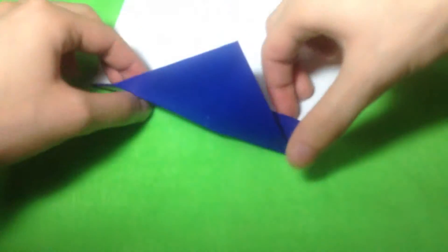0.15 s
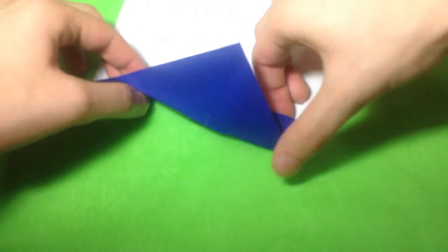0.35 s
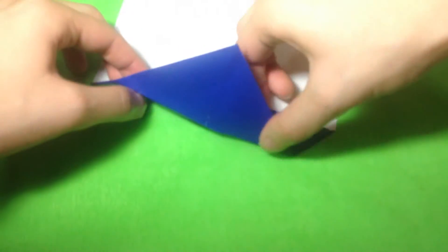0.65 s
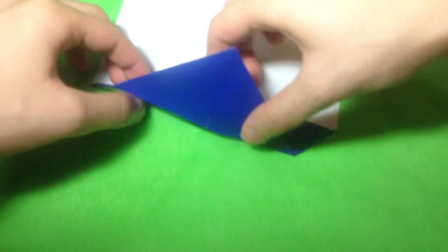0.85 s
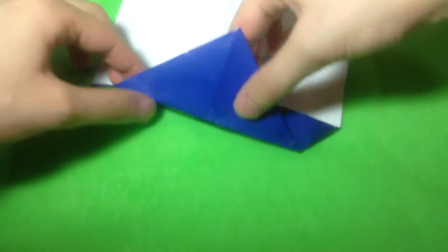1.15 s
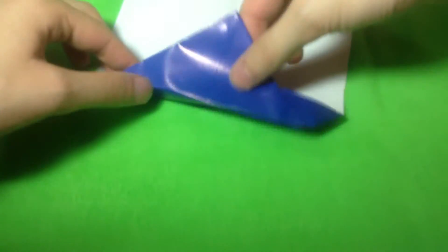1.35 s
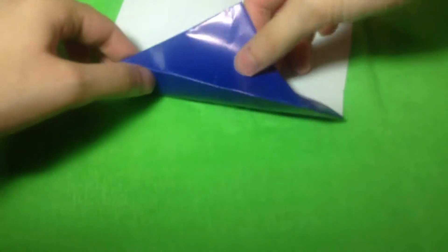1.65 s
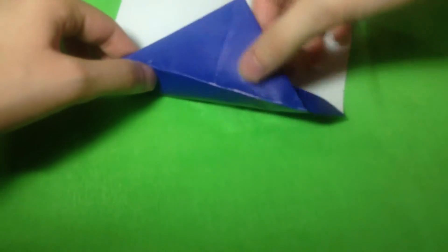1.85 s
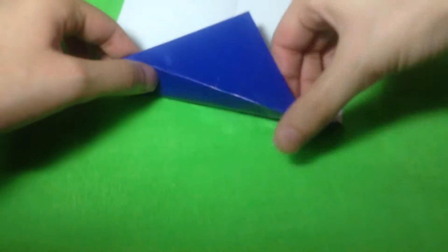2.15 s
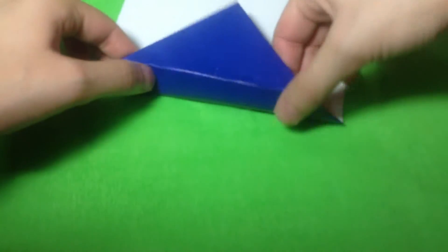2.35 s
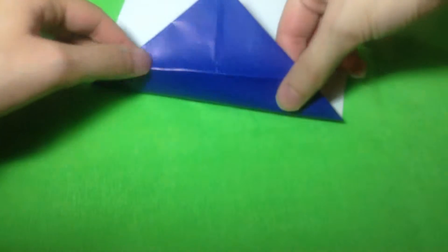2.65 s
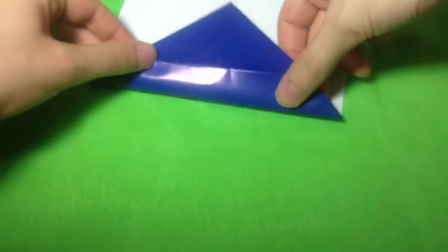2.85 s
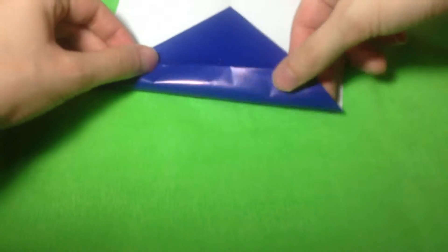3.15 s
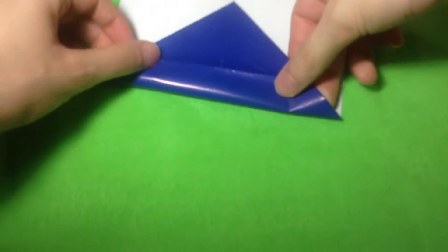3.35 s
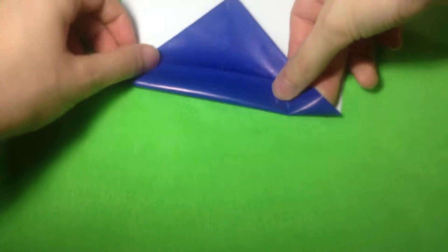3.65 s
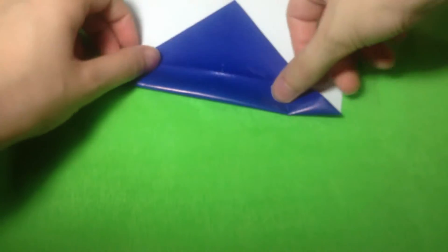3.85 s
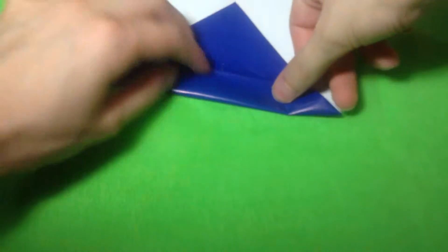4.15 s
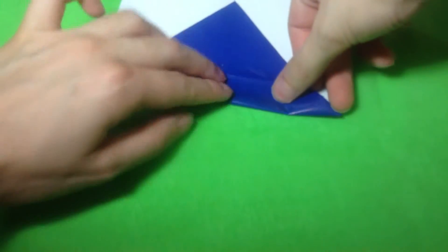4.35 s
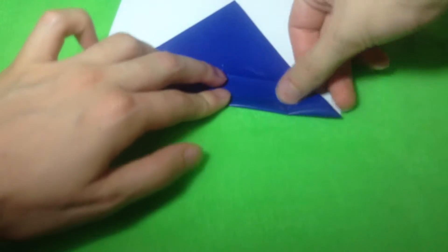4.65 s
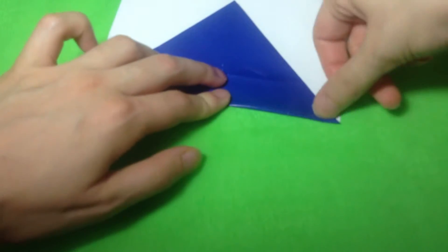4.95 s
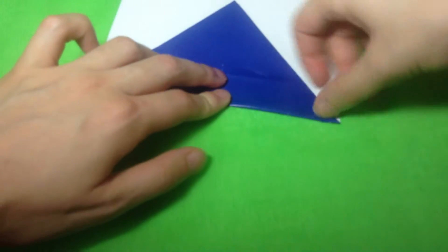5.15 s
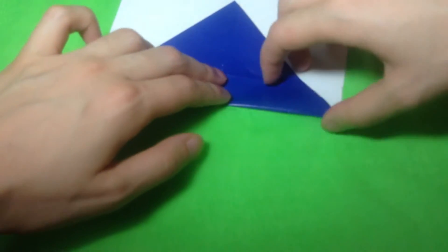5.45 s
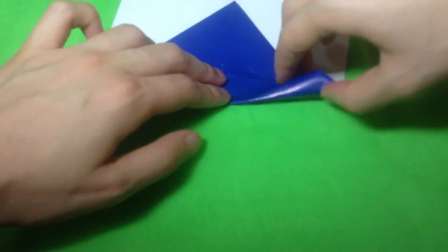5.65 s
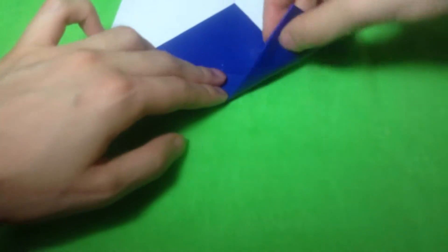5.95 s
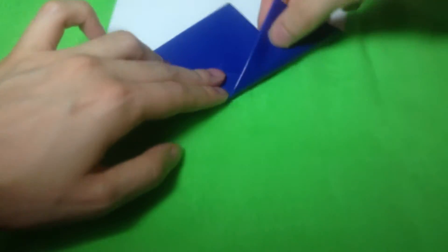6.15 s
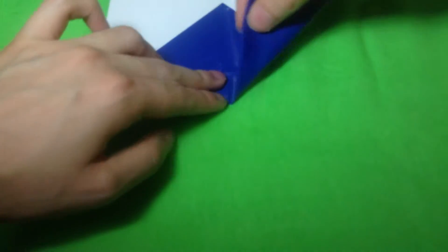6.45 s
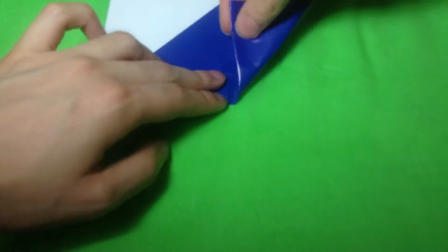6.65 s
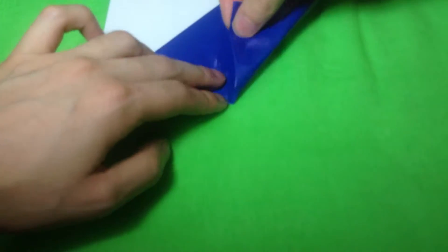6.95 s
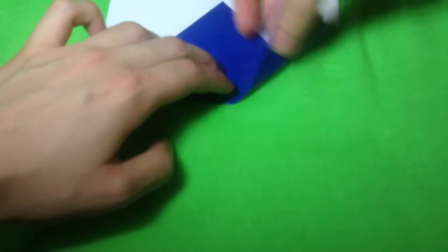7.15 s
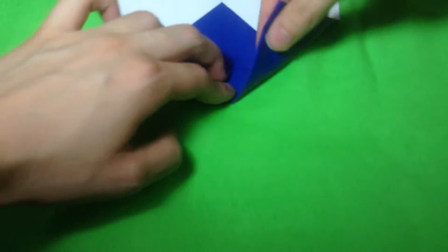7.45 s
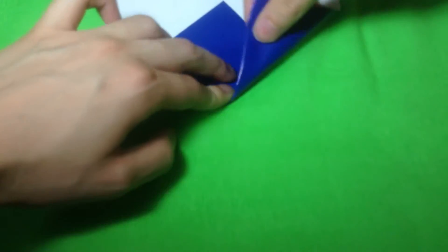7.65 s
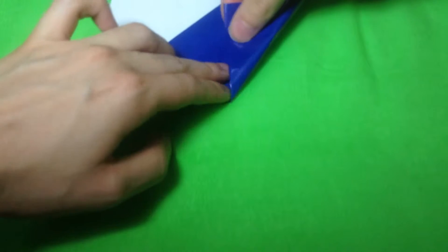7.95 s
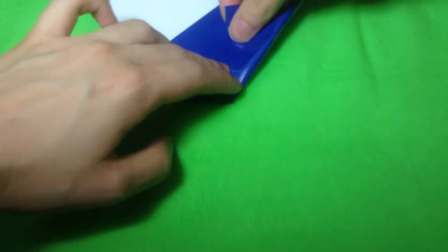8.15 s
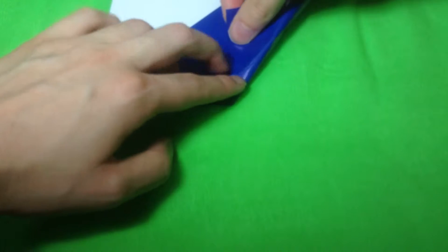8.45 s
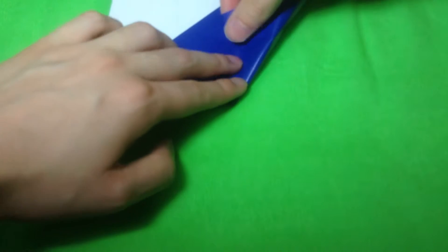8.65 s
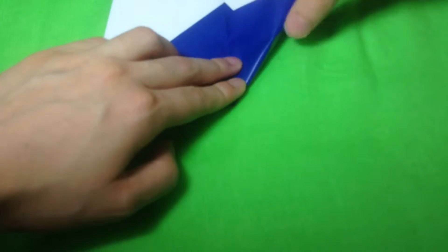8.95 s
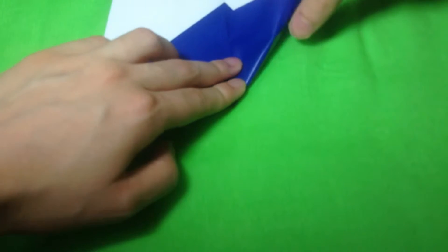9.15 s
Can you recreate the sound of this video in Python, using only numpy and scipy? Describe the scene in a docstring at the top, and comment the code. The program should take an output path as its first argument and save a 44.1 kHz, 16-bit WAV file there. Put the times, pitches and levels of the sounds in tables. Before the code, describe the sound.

Glossy paper crinkles and snaps sharply as hands fold and crease it on a cloth-covered table, over a faint steady hum in a quiet room.

```python
"""Creases snap, taps and short crinkling strokes mix, and one finger squeaks faintly over hum and hiss.
Two hands fold a small sheet of glossy paper on a cloth-covered table in a quiet room.
Snaps and taps are decaying noise bursts that ring flaps or panels; strokes are swelling friction noise
with tiny buckles; drags and slips are shaped noise; flops, squeaks and hum are sines.
Sparse echoes and a diffuse noise tail make the room ring briefly after each snap."""
import sys
import numpy as np
from scipy import signal
from scipy.fft import rfft, irfft, next_fast_len
from scipy.io import wavfile

SR = 44100
rng = np.random.default_rng(int(sys.argv[2]) if len(sys.argv) > 2 else 0)


def output_pcm(signal):
    """Save a mono or channel-first signal as 16-bit PCM at the path in sys.argv[1].

    Samples are clipped to [-1, 1] before scaling.
    """
    pcm = np.clip(np.atleast_2d(signal).T, -1, 1) * 32767
    wavfile.write(sys.argv[1], SR, np.round(pcm).astype(np.int16))


N = 410571
TIME = np.arange(N) / SR

# registers of the paper, one row each for thump, body, crack, fizz: (low edge [Hz], high edge [Hz])
REGISTERS_HZ = [(200, 550), (680, 1800), (1800, 6000), (6000, 15500)]


def from_db(db):
    """Decibels to gain."""
    return 10 ** (np.asarray(db) / 20)


def rms_one(x):
    """Scale to rms 1."""
    return x / np.sqrt(np.mean(x ** 2) + 1e-20)


def at_hz(points, hz):
    """Interpolate a table on a log-frequency axis."""
    freqs, values = np.transpose(points)
    return np.interp(np.log(np.maximum(hz, 1)), np.log(freqs), values)


def band(x, low_hz, high_hz):
    """Causal third-order band-pass."""
    sos = signal.butter(3, [low_hz, high_hz], "band", fs=SR, output="sos")
    return signal.sosfilt(sos, x)


def resonate(x, hz, width_hz):
    """Two-pole resonance with gain 1 at its peak."""
    r = np.exp(-np.pi * width_hz / SR)
    numerator = np.array([1, 0, -1]) * (1 - r * r) / 2
    return signal.lfilter(numerator, [1, -2 * r * np.cos(2 * np.pi * hz / SR), r * r], x)


def decay(impulses, t60_s):
    """Let each impulse die away exponentially."""
    # the tiny offset keeps the filter out of denormals
    return signal.lfilter([1], [1, -from_db(-60 / (t60_s * SR))], impulses + 1e-18)


def shaped(x, spectrum):
    """Filter noise to a spectrum; rms 1."""
    size = next_fast_len(N)
    gains = from_db(at_hz(spectrum, np.fft.rfftfreq(size, 1 / SR)))
    return rms_one(irfft(rfft(x, size) * gains, size)[:N])


def drift(rate_hz):
    """Slow random wander with rms 1, drawn at every 40th sample."""
    step, warmup = 40, 2000
    r = np.exp(-2 * np.pi * rate_hz * step / SR)
    noise = rng.standard_normal(N // step + warmup + 2)
    slow = signal.lfilter([1], [1, -2 * r, r * r], noise)[warmup:]
    return np.interp(np.arange(N) / step, np.arange(len(slow)), rms_one(slow))


def swell(middle_s, length_s):
    """Smooth rise and fall around one moment."""
    return np.exp(-np.minimum((2 * (TIME - middle_s) / length_s) ** 2, 50))


def coloured(x):
    """Add the standing resonances that colour the paper to an excitation."""
    # (frequency [Hz], width [Hz], level [dB])
    resonances = [(830, 620, -9.5), (1150, 150, -20), (2850, 320, -6.5), (3670, 1100, 0.5),
                  (5060, 1050, -2.5), (8900, 5400, 1), (10800, 2200, -9.5), (13900, 820, -14)]
    return x + sum(from_db(db) * resonate(x, hz, width_hz) for hz, width_hz, db in resonances)


def background():
    """An appliance hums with slightly unsteady partials over steady air noise."""
    # air hiss, relative: (frequency [Hz], level [dB per Hz])
    air_spectrum = [(25, -20), (60, -22.5), (100, -14.5), (140, -1.5), (190, 4), (260, 3), (350, 0.5),
                    (480, -2.5), (700, -10.5), (1200, -12.5), (2200, -17), (4200, -20), (6500, -19),
                    (15000, -18.5)]
    # mains hum: (frequency [Hz], level of the steady part [dB rms], unsteadiness [0-1])
    hum_partials = [(200.5, -69.5, 0.8), (231, -82.5, 1), (300, -74, 0.53), (399.7, -62, 0.06),
                    (480, -90.5, 0.7)]
    air_db = -64
    out = from_db(air_db) * shaped(rng.standard_normal(N), air_spectrum)
    for hz, db, unsteady in hum_partials:
        phase = 2 * np.pi * (hz * TIME + rng.random())
        in_phase = (1 + unsteady * drift(9.0)) * np.sin(phase)
        quadrature = unsteady * drift(7.6) * np.cos(phase)
        out += from_db(db) * np.sqrt(2) * (in_phase + quadrature)
    return out


def stroke_gains(rise=0.81, fall=0.97, steepness=1.54):
    """Strokes set in quickly, fade more slowly and add in power to the grip; gains of body, crack, fizz."""
    # finger or paper layer over another: (middle [s], length [s], crack level [dB], brightness [dB])
    stroke_rows = [(0.054, 0.14, -60, 2), (0.158, 0.2, -60, -2.5), (0.345, 0.4, -68, -1.5),
                   (0.716, 0.12, -62, -1.5), (0.827, 0.1, -53, -0.5), (0.92, 0.064, -56, 2),
                   (1.05, 0.095, -57.5, 1.5), (1.188, 0.22, -57, -0.5), (1.374, 0.17, -54.5, 1.5),
                   (1.548, 0.23, -62, -1.5), (1.694, 0.099, -59, 6.5), (1.77, 0.12, -64.5, -5),
                   (1.85, 0.23, -69, 13), (2.03, 0.55, -63.5, -4), (2.199, 0.11, -61.5, -1),
                   (2.067, 0.05, -64, 2), (2.369, 0.079, -62, 5), (2.43, 0.17, -61.5, 1.5),
                   (2.697, 0.12, -63.5, 8), (2.77, 0.09, -70, -4), (2.917, 0.13, -51.5, 4.5),
                   (3.126, 0.18, -58.5, 2.5), (3.238, 0.059, -59.5, 4), (3.318, 0.12, -60, 1),
                   (3.67, 0.46, -68, 4.5), (3.779, 0.085, -58, 1), (4.15, 0.21, -54.5, 4.5),
                   (4.746, 0.21, -63, 11), (5.197, 0.057, -59.5, 3.5), (5.426, 0.55, -73.5, 5),
                   (5.695, 0.41, -77, -7), (5.85, 0.11, -50, -0.5), (5.97, 0.062, -58, -1.5),
                   (6.159, 0.11, -55, 7), (6.312, 0.067, -58, -1), (6.568, 0.059, -60, -2),
                   (6.644, 0.05, -44.5, -1.5), (6.942, 0.6, -66, -1), (7.125, 0.24, -63, 9),
                   (7.404, 0.085, -59, 1), (7.572, 0.11, -58.5, 6), (7.712, 0.21, -60, 0),
                   (7.953, 0.16, -57, 2), (8.008, 0.011, -51, 12), (8.16, 0.081, -59.5, -1),
                   (8.344, 0.11, -59, -0.5), (8.69, 0.46, -60, 1), (8.94, 0.22, -63.5, -2),
                   (9.284, 0.18, -57.5, 2.5)]
    body_db, body_loss_db_per_db = -6.5, 0.71   # a brighter stroke has less body
    grip_db, grip_wander_db = -72.5, 5.5   # the holding fingers never rest entirely
    grip = from_db(grip_db + grip_wander_db * drift(4.1))
    power = np.outer(from_db([body_db, 0, 0]), grip) ** 2
    for s, length_s, db, bright_db in stroke_rows:
        first = max(int((s - 2 * length_s) * SR), 0)
        near = slice(first, int((s + 2 * length_s) * SR))
        way = 2 * (TIME[near] - s) / length_s
        envelope = np.exp(-np.where(way < 0, -way / rise, way / fall) ** steepness)
        levels = from_db([db + body_db - body_loss_db_per_db * bright_db, db, db + bright_db])
        power[:, near] += np.outer(levels, envelope) ** 2
    return np.sqrt(power)


def tiny_buckles(per_s, spread_db, clump_db):
    """Random impulses in clumps, most of them weak."""
    born = rng.random(N) < per_s * from_db(clump_db * drift(8)) / SR
    return born * from_db(spread_db * np.minimum(rng.exponential(1, N), 2.5))


def crinkles(per_s=200.0, spread_db=12.5, clump_db=4.0, t60_s=0.035):
    """Clumped tiny buckles set off decaying noise; rms 1."""
    envelope = decay(tiny_buckles(per_s, spread_db, clump_db), t60_s)
    return rms_one(envelope * rng.standard_normal(N))


def crackles(per_s=170.0, spread_db=7.5, clump_db=3.5, facet_q=2.5, facet_count=14):
    """Separate tiny buckles each ring a facet of its own size for a few cycles; rms 1."""
    clicks = tiny_buckles(per_s, spread_db, clump_db) * rng.choice([-1, 1], N)
    dealt = rng.integers(0, facet_count, N)
    out = np.zeros(N)
    for k, hz in enumerate(np.geomspace(900, 12000, facet_count)):
        own_clicks = clicks * (dealt == k) + 1e-18
        out += resonate(own_clicks, hz, hz / facet_q) / hz ** 0.25
    return rms_one(out)


def sliding(judder_db=2.5, glide_db=-72.5, crackle_db=-4.5):
    """Friction hiss with crinkles and crackles; in fast gliding strokes these grow less than the hiss."""
    # friction noise ahead of the resonances, relative: (frequency [Hz], level [dB per Hz])
    friction_spectrum = [(400, 10), (800, 12.5), (1500, 5), (2100, -1), (3300, -1), (6000, -3.5),
                         (10000, -6), (15000, -3)]
    hiss = coloured(shaped(rng.standard_normal(N), friction_spectrum))
    hiss = hiss * from_db(judder_db * drift(26))
    grains = crinkles() + from_db(crackle_db) * crackles()
    grains = coloured(shaped(grains, friction_spectrum))
    out = np.zeros(N)
    for edges_hz, gain in zip(REGISTERS_HZ[1:], stroke_gains()):
        catching = gain / np.sqrt(1 + gain / from_db(glide_db))
        out += gain * rms_one(band(hiss, *edges_hz))
        out += catching * rms_one(band(grains, *edges_hz))
    return out


def buckles():
    """Taps and snaps as (s, four register levels dB, flap Hz, ring dB, flap Q, roll-off Hz, hold s, t60 s)."""
    # fingertips tapping the sheet onto the table: (time [s], body level [dB], thump above body [dB],
    # crack above body [dB], flap resonance [Hz])
    tap_rows = [(0.055, -50.5, -6, -1.5, 930), (0.1492, -55.5, -18, -9, 1000), (0.247, -56, -3, -12, 990),
                (0.355, -59, -4, -10, 1100), (0.3928, -50.5, -9, -18, 1130), (0.61, -58, 1, -12, 1010),
                (0.6235, -50.5, -8, -16, 990), (0.804, -57, -12, -1, 970), (0.852, -46.5, -4, -4, 1010),
                (1.1757, -40.5, -1, -12, 830), (1.2905, -46.5, -6, -8, 1120), (1.494, -59, 3, -6, 900),
                (1.998, -48, 2, -6, 870), (2.061, -60, 1, 2, 800), (2.341, -61, 0, -15, 800),
                (2.3795, -51.5, -4, -9, 910), (2.394, -50.5, -1, -3, 950), (2.46, -45.5, -11, -11, 850),
                (2.6545, -48.5, -2, -23, 800), (2.8212, -51, 2, -4, 850), (3.1415, -59.5, 9, -1, 760),
                (3.6922, -54.5, 0, -9, 785), (3.7237, -57, -2, 1.5, 610), (5.3456, -59, -10, -4, 940),
                (6.2768, -59, -6, 6, 915), (7.855, -60, 2, -12, 860), (7.891, -55, 1, -4, 650),
                (7.9465, -46.5, -2.5, -0.5, 745), (7.992, -61, 14, 5, 760), (8.0815, -57.5, -2, 0, 680),
                (8.114, -58, 9, 7.5, 774), (8.4771, -45.5, -3.5, -2, 920), (8.624, -53, -24, 2, 900),
                (8.655, -56.5, -15, -4, 950), (8.697, -55, -9, -4, 950), (8.852, -53.5, -20, -1, 970)]
    # creases snapping through: (time [s], crack level [dB], body above crack [dB],
    # fizz above crack [dB], flap resonance [Hz], flap ring before its share [dB])
    snap_rows = [(0.2968, -49.5, -2.5, 4, 4930, 21), (0.4088, -55, -6, 3, 3770, 7),
                 (0.816, -52, -18, 3, 5000, 3), (0.875, -36.5, -5.5, -20.5, 3420, 12),
                 (0.8849, -24.5, -9.5, -1.5, 3030, 0), (0.918, -33, -8.5, -4.5, 5000, -6),
                 (1.0957, -27.5, -8, -0.5, 8200, 2), (1.351, -29, -3.5, -4.5, 880, 0),
                 (1.651, -48.5, -9, 1, 3400, 14), (1.7947, -46, -3, -14.5, 3200, 8),
                 (2.021, -55.5, 1, 2, 860, -4), (2.026, -55, 1, -4, 1300, -2), (2.411, -57, 2, -8, 3400, 4),
                 (2.4533, -40.5, 1, -10.5, 1800, 8), (2.486, -57, 2, -2, 1900, 10),
                 (2.497, -55, -7, 0, 1500, 2), (2.543, -57, -11, 2, 3980, -5),
                 (2.8495, -56, -3, 6, 7760, -3), (2.859, -53, -11, 6, 5500, -10),
                 (2.9913, -38, -3.5, -7.5, 2640, 3), (3.115, -54, -10, 0, 3900, 3),
                 (3.3602, -36.5, -8, -3, 2780, 10), (3.489, -56, -10, -6, 3500, 10),
                 (3.55, -48, -4.5, -2, 3300, 12), (3.6149, -32, -11.5, -6.5, 3400, 3),
                 (3.705, -52, -1.5, 0.5, 3400, 11), (3.8038, -49, -16, 0.5, 6100, 5),
                 (3.8689, -48, -28, -0.5, 3350, 11), (3.971, -60, -10, -2, 3500, 6),
                 (4.1843, -39.5, -4.5, -4, 4000, 4), (4.4417, -42, -11.5, -7, 4230, 12),
                 (4.629, -54, -16, -3, 4550, 10), (5.0598, -53.5, -10, -3, 4350, 8),
                 (5.2664, -54, -24, -5.5, 3670, 26), (5.436, -49, -22, 3, 4740, 16),
                 (5.499, -49.5, -16, -5, 4800, 25), (5.6538, -53.5, -3.5, -3.5, 4400, -8),
                 (5.757, -68, -4, 9, 4500, 1), (5.804, -47.5, -2, -7, 2160, 0),
                 (5.9075, -44, -11.5, -2.5, 6040, 8), (6.047, -60, -3, -2, 4000, -3),
                 (6.085, -55.5, -7, 1.5, 4500, 6), (6.2225, -47, -10, -5.5, 3870, 25),
                 (6.523, -36.5, -4.5, -10, 2160, -5), (6.621, -21, -15, 3.5, 5060, -16),
                 (6.7714, -46, -5, -5.5, 1560, 8), (6.7917, -35, -7, -8, 2850, -7),
                 (6.809, -40.5, -12, -18, 3840, 36), (6.8533, -45, -6.5, -1, 6800, 0),
                 (6.984, -51.5, -8, -4, 2880, 0), (7.166, -28.5, -8, 1, 7950, 20),
                 (7.308, -58, -9, -2, 4200, 9), (7.475, -27.5, -13, 0, 4300, 18),
                 (7.5542, -50, 0, 2, 8580, 4), (7.637, -54, -21, 3.5, 4500, -1),
                 (7.781, -55, -6, -1, 4000, -5), (7.885, -51, -8, -2, 4830, 3),
                 (7.909, -28.5, -14, -1.5, 2490, 19), (8.018, -46, -9, 3.5, 800, 22),
                 (8.1453, -52.5, -7, -1, 770, 40), (8.355, -52, -13, -3.5, 4500, -6),
                 (8.463, -52.5, -6, 2.5, 5580, 4), (8.552, -57, -9, -6, 4500, -5),
                 (8.599, -34, -7.5, -3, 4930, 13), (8.758, -53, -21, 2, 4550, 15),
                 (8.874, -52, -11, -6.5, 1620, 1), (8.926, -51.5, -8, -7, 4000, 13),
                 (8.9784, -48.5, -2, 3, 1030, 29), (9.19, -28, -10, -4.5, 2360, 20),
                 (9.1948, -22.5, -16.5, -3, 2500, 8)]
    tap_fizz_db, tap_ring_db, tap_q = -4.5, 13.5, 6.4   # fizz re crack; flap damped by the fingertip
    tap_top_hz, tap_hold_s, tap_t60_s = 16000, 0.0018, 0.016
    snap_thump_db, snap_q = -11, 7.3   # thump re body; flap left free
    snap_base_top_hz, top_octaves_per_db = 15800, 0.36   # roll-off rises with the fizz
    snap_hold_s, snap_t60_s = 0.00086, 0.018
    rows = []
    for s, db, thump, crack, hz in tap_rows:
        levels_db = (db + thump, db, db + crack, db + crack + tap_fizz_db)
        rows.append((s, *levels_db, hz, tap_ring_db, tap_q, tap_top_hz, tap_hold_s, tap_t60_s))
    for s, db, body, fizz, hz, ring_db in snap_rows:
        levels_db = (db + body + snap_thump_db, db + body, db, db + fizz)
        top_hz = snap_base_top_hz * 2 ** (top_octaves_per_db * fizz)
        rows.append((s, *levels_db, hz, ring_db, snap_q, top_hz, snap_hold_s, snap_t60_s))
    return rows


def panel_ring(modes, size, raw_db=-12.5, scatter_hz=900.0, rattle_db=-19.0, rattle_t60_s=0.017):
    """A kick, smeared by the folds it crosses and rattling on briefly, rings the modes of the panels."""
    kick, r = signal.unit_impulse(size), np.exp(-np.pi * scatter_hz / SR)
    for hz in rng.uniform(500, 15000, 14):
        # all-pass: delays each frequency differently
        poles = [1, -2 * r * np.cos(2 * np.pi * hz / SR), r * r]
        kick = signal.lfilter(poles[::-1], poles, kick)
    rattle_gain = from_db(rattle_db - 60 * np.arange(size) / (rattle_t60_s * SR))
    kick = kick + rng.standard_normal(size) * rattle_gain
    ringing = sum(from_db(db) * resonate(kick, hz, width_hz) for hz, width_hz, db in modes)
    return from_db(raw_db) * kick + ringing


def snaps(scatter, flap_share, flap_widening=1, with_panels=False, weights_db=(0, 0, 0, 0), kick=2.64):
    """Snaps and taps kick the sheet; waves scatter, die in milliseconds and ring a flap or whole panels."""
    # panels rung by the largest snaps, changing with each fold: (time of the snap [s], low modes,
    # high modes), each mode as (frequency [Hz], width [Hz], relative level [dB])
    panel_rows = [(0.8851, [(790, 130, -5), (1090, 170, 7), (1700, 140, -11)], [(2960, 410, 4),
                  (3960, 160, 3), (5400, 240, 0), (8300, 190, -12), (9900, 340, 2), (13500, 320, -5)]),
                  (1.0955, [(538, 140, -2), (1160, 190, -4), (1890, 150, -8)], [(2970, 230, 0),
                  (3900, 320, -1), (5950, 800, 1.5), (7830, 180, 3), (8500, 460, 2), (10000, 280, -11),
                  (13000, 600, -4)]), (1.352, [(835, 130, 3), (1780, 89, -7)], [(2960, 240, -2),
                  (4850, 330, 0.5), (7100, 200, -7), (8400, 250, -1), (12000, 140, -18),
                  (14400, 180, -25)]), (3.6151, [(930, 250, -9)], [(3120, 630, -6), (4950, 300, -18),
                  (8100, 180, -11), (11500, 410, -14), (13700, 180, -21)]), (6.621, [(900, 260, -7)],
                  [(3560, 240, -11), (5140, 480, 0.5), (6540, 170, -5), (8700, 210, -16), (9900, 190, -8),
                  (10800, 360, -4), (12200, 210, -7), (14100, 400, -1)]), (6.7925, [(883, 360, -5),
                  (1550, 120, -6)], [(2880, 200, 1), (4300, 440, 3), (7280, 400, -11), (8900, 300, -29),
                  (12300, 190, -31)]), (7.1664, [(624, 550, -5), (1680, 120, -18), (2130, 140, -6)],
                  [(4330, 380, -2), (4930, 140, 3), (7260, 110, -2), (7970, 140, -1), (8760, 330, 3),
                  (11000, 250, -5), (14700, 170, -18)]), (7.475, [(700, 130, -5), (1040, 100, 3),
                  (1650, 98, -3.5)], [(3820, 300, 8), (5030, 600, 5.5), (8400, 850, 4), (9460, 150, 0),
                  (11200, 190, -10), (13600, 160, -10), (14700, 380, -16)]), (7.909, [(791, 160, 0),
                  (1590, 200, -6)], [(2460, 340, 0), (4250, 220, 2), (5140, 210, -5), (6300, 510, -8),
                  (8730, 280, -18), (10900, 500, 1), (14500, 360, -20)]), (8.5995, [(877, 130, -3),
                  (1560, 180, 0)], [(2880, 190, -4), (4870, 940, -1), (6900, 220, -9), (8700, 240, -5),
                  (11200, 170, -3), (11800, 240, -9)]), (9.1947, [(1100, 290, 2.5)], [(2520, 290, -3.5),
                  (3780, 350, -4), (5100, 240, 1), (7960, 420, -2), (8700, 340, -2), (10900, 280, -19),
                  (12800, 1010, -21)])]
    size, level_span_s = 2048, .005   # a level is burst energy spread over this span
    out, age_s = np.zeros(N + size), np.arange(size) / SR
    for s, *levels_db, flap_hz, ring_db, flap_q, top_hz, hold_s, t60_s in buckles():
        modes = []
        for when_s, low, high in panel_rows:
            if abs(when_s - s) < .003:
                modes += low + high
        if with_panels and modes:
            burst = panel_ring(modes, size)
        else:
            waves = scatter * rng.standard_normal(size) + kick * (age_s == 0)
            burst = coloured(waves * from_db(-60 * np.maximum(age_s - hold_s, 0) / t60_s))
            ring = resonate(burst, flap_hz, flap_widening * flap_hz / flap_q)
            burst = burst + flap_share * from_db(ring_db) * ring
        # a slower buckle has less of the very top
        burst = signal.sosfilt(signal.butter(3, min(top_hz, .45 * SR), fs=SR, output="sos"), burst)
        start = int(s * SR)
        for edges_hz, db, weight_db in zip(REGISTERS_HZ, levels_db, weights_db):
            gain = from_db(db + weight_db) * np.sqrt(level_span_s * SR / size)
            out[start:start + size] += gain * rms_one(band(burst, *edges_hz))
    return out[:N]


def drags(grit_db=-5.0, catch_db=2.5):
    """Skin catches and lets go, and its friction drives one resonance of the pressed flap."""
    # (middle [s], length [s], level at the middle [dB], resonance [Hz],
    # width of the first of two filters [Hz])
    drag_rows = [(0.13, 0.21, -67, 1150, 450), (1.06, 0.038, -56, 3380, 700),
                 (2.417, 0.26, -61.5, 2270, 2400), (2.879, 0.034, -53.5, 3180, 700),
                 (4.094, 0.09, -52.5, 3650, 700), (4.09, 0.1, -54, 4970, 1800),
                 (4.174, 0.06, -52, 3680, 1100), (4.569, 0.021, -55.5, 4370, 1300),
                 (4.708, 0.13, -54.5, 4770, 1000), (4.733, 0.11, -58.5, 3870, 1100),
                 (5.442, 0.064, -62.5, 740, 250), (5.849, 0.054, -47, 3600, 695),
                 (6.166, 0.023, -50.5, 7300, 1500), (7.962, 0.054, -65, 750, 277),
                 (8.012, 0.018, -55, 764, 220), (8.07, 0.066, -73, 774, 240), (8.16, 0.064, -66, 746, 200),
                 (8.319, 0.067, -63, 830, 260)]
    friction = rng.standard_normal(N) + from_db(grit_db) * crinkles()
    friction = friction * from_db(catch_db * drift(150))
    out = np.zeros(N)
    for s, length_s, db, hz, width_hz in drag_rows:
        ring = resonate(resonate(friction, hz, width_hz), hz, 2 * width_hz)
        out += from_db(db) * swell(s, length_s) * rms_one(ring)
    return out


def flops():
    """A panel swings through and pushes the air for a few cycles: a low pulse or a hollow pop."""
    # (time [s], peak level before the band-pass [dB], frequency [Hz], swing length [s], t60 [s])
    flop_rows = [(1.096, -30, 440, 0, 0.014), (1.1791, -38, 262, 0, 0.028), (1.3425, -42, 620, 0.006, 0.04),
                 (1.3493, -29.5, 340, 0.00058, 0.025), (1.7947, -33, 910, 0.0036, 0.0035),
                 (2.654, -40, 330, 0, 0.032), (3.3599, -42, 355, 0.0014, 0.031)]
    out = np.zeros(N)
    for s, db, hz, swing_s, t60_s in flop_rows:
        age_s = np.clip(TIME - s, 0, 1)
        envelope = from_db(db - 60 * np.maximum(age_s - swing_s, 0) / t60_s)
        out += envelope * np.sin(2 * np.pi * hz * age_s)
    # air slips round the edge of so small a sheet, so it radiates no deep bass
    return band(out, 135, 2000)


def squeak(waver=0.00417, flutter_db=1.5):
    """A fingertip sticks and slips on the glossy face: a sine and its octave, unsteady in pitch and level."""
    # (middle [s], length [s], mean pitch [Hz], level before flutter [dB], octave re fundamental [dB])
    squeak_rows = [(4.612, 0.086, 1220, -67.5, -8), (4.65, 0.075, 1224, -73, 4),
                   (4.79, .09, 1815, -78, -14)]
    out = np.zeros(N)
    for s, length_s, hz, db, octave_db in squeak_rows:
        phase = 2 * np.pi * np.cumsum(hz * (1 + waver * drift(41))) / SR
        tone = np.sin(phase) + from_db(octave_db) * np.sin(2 * phase)
        out += from_db(db) * swell(s, length_s) * np.sqrt(2) * tone
    return out * from_db(flutter_db * drift(60))


def chatter(jitter=0.051, t60_s=.015):
    """Two layers creep over each other in nearly even stick-slip ticks as the fold is pressed."""
    # (start [s], end [s], rate [slips per s], first slip level [dB], last slip level [dB])
    runs = [(6.914, 6.988, 99, -48, -38), (7.992, 8.022, 95, -46, -41)]
    # one slip, relative: (frequency [Hz], level [dB per Hz])
    slip_spectrum = [(60, -40), (170, -2), (350, 8), (800, 4), (1500, -15), (2600, -3), (8000, -9),
                     (15000, -4)]
    slips = np.zeros(N)
    for start_s, end_s, per_s, first_db, last_db in runs:
        times_s = start_s + (np.arange(20) + jitter * rng.standard_normal(20)) / per_s
        times_s = times_s[times_s < end_s]
        levels_db = np.interp(times_s, [start_s, end_s], [first_db, last_db])
        slips[(times_s * SR).astype(int)] = from_db(levels_db)
    envelope = decay(slips, t60_s)
    noise = shaped(envelope * rng.standard_normal(N), slip_spectrum)
    return np.sqrt(np.mean(envelope ** 2)) * noise


def room(x, wet_db=-12.0, onset_s=0.0031):
    """A few near reflections, then a diffuse tail that dies band by band."""
    # decay: (frequency [Hz], t60 [s])
    decay_times = [(200, 0.46), (1000, 0.28), (3000, 0.27), (7000, 0.26), (15000, 0.27)]
    # reflections from things around the table: (delay [s], level [dB])
    echo_rows = [(.0098, -42), (0.021, -25.5), (0.027, -34)]
    size = 16384
    age_s, tail = np.arange(size) / SR, np.zeros(size)
    edges_hz = np.geomspace(150, 17000, 8)
    for low_hz, high_hz in zip(edges_hz, edges_hz[1:]):
        t60_s = at_hz(decay_times, np.sqrt(low_hz * high_hz))
        tail += band(rng.standard_normal(size), low_hz, high_hz) * from_db(-60 * age_s / t60_s)
    tail *= 1 - np.exp(-(age_s / onset_s) ** 2)
    response = from_db(wet_db) * rms_one(tail) / np.sqrt(size)
    for delay_s, db in echo_rows:
        response[int(delay_s * SR)] += from_db(db)
    return signal.fftconvolve(x, response)[:N]


def scene():
    """The paper close by, its room and the hum."""
    handling = sliding() + drags() + flops() + squeak() + chatter()
    direct = snaps(scatter=0.86, flap_share=0.86, with_panels=True)
    # the room gathers a snap from all directions, so its peaks and notches average out
    all_round = snaps(scatter=0.23, flap_share=.28, flap_widening=2.2, weights_db=(2.0, 2.0, 1.5, -0.5))
    return (direct + handling + room(all_round + handling) + background())[None]


def record(dry):
    """Cut the top steeply with an elliptic low-pass at 15450 Hz."""
    return signal.sosfilt(signal.ellip(10, .1, 70, 15450, fs=SR, output="sos"), dry)


dry = scene()
out = record(dry)
output_pcm(out)
```